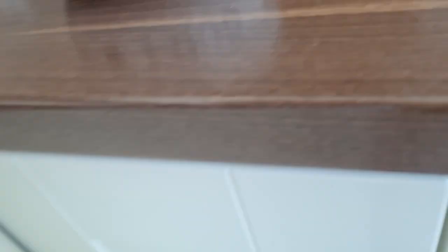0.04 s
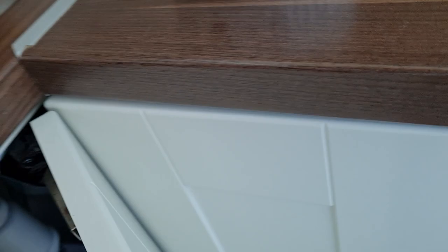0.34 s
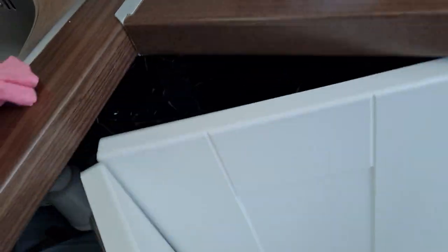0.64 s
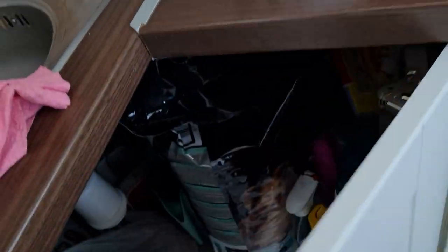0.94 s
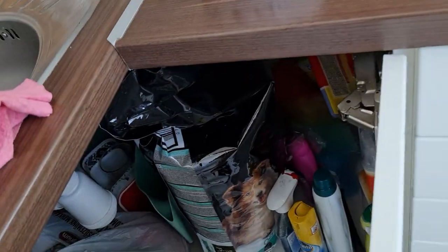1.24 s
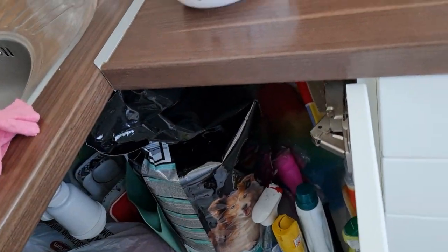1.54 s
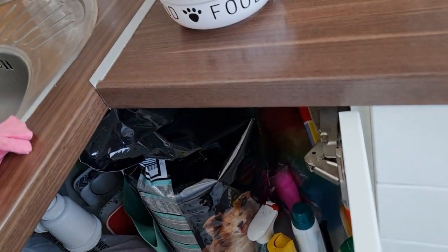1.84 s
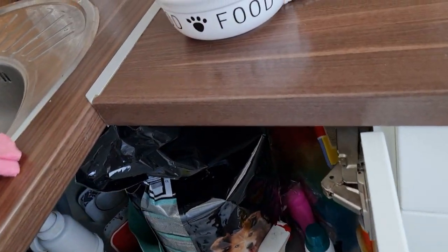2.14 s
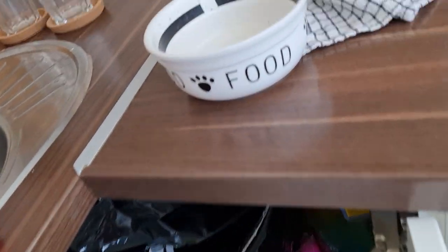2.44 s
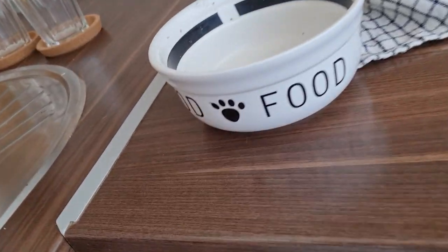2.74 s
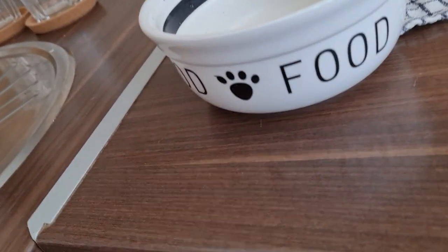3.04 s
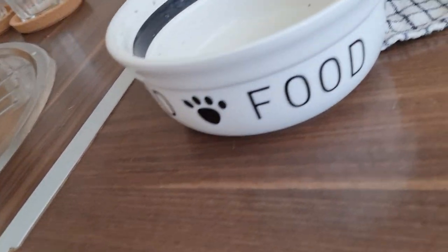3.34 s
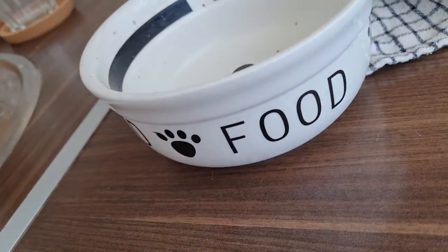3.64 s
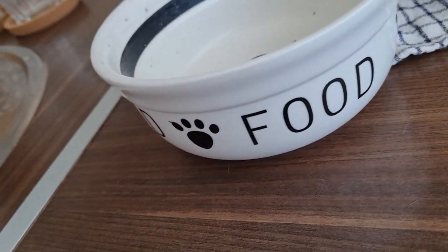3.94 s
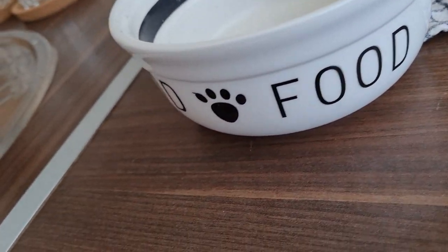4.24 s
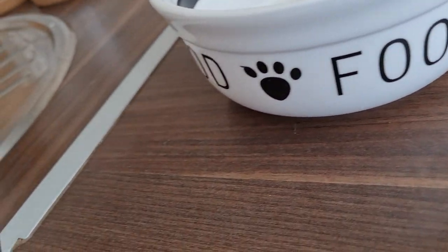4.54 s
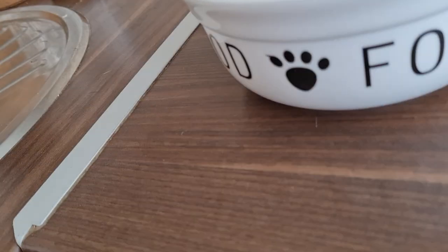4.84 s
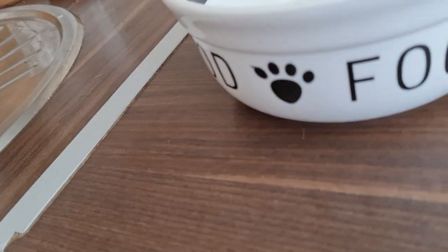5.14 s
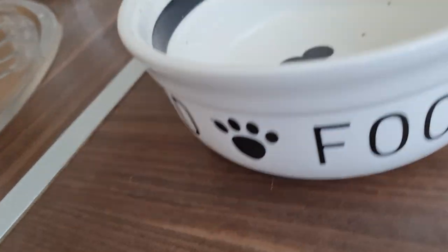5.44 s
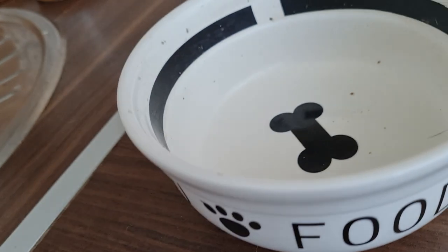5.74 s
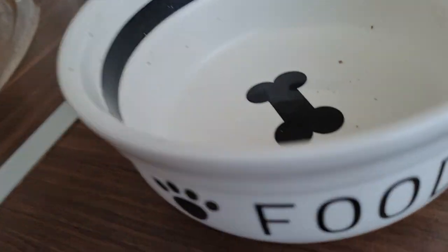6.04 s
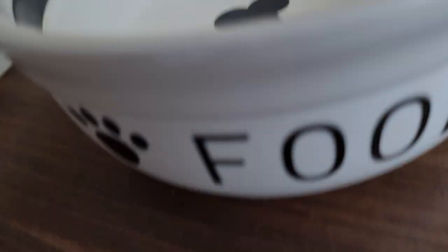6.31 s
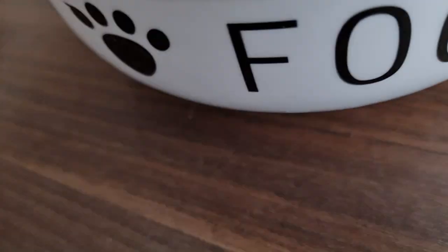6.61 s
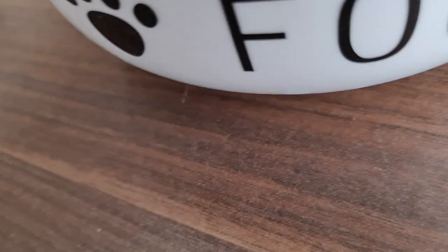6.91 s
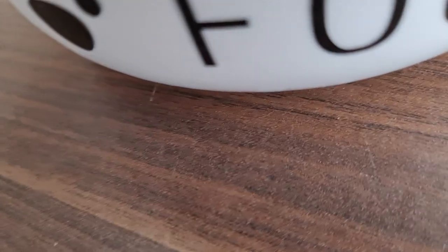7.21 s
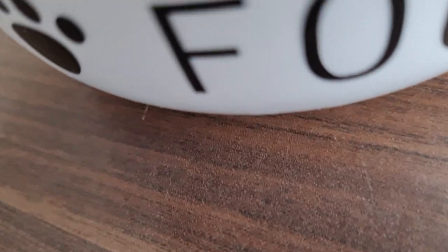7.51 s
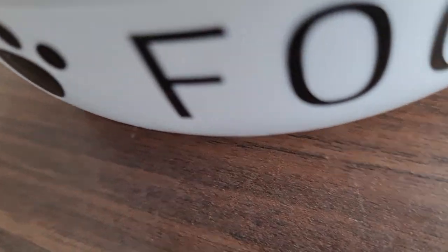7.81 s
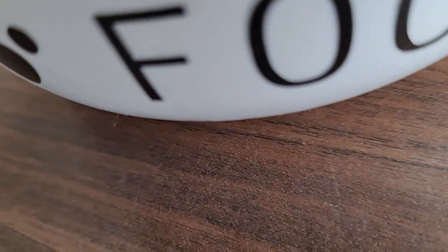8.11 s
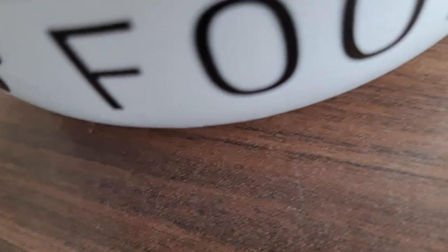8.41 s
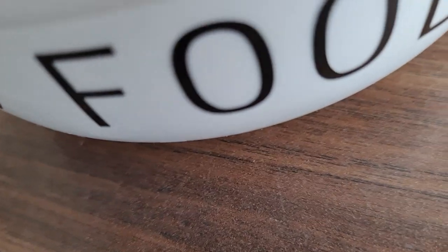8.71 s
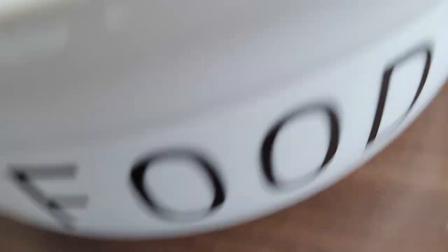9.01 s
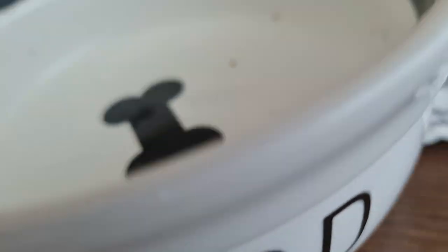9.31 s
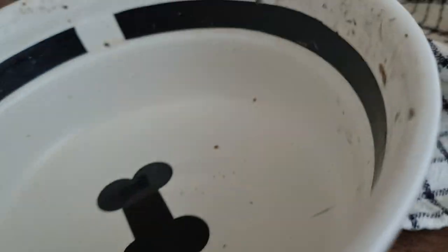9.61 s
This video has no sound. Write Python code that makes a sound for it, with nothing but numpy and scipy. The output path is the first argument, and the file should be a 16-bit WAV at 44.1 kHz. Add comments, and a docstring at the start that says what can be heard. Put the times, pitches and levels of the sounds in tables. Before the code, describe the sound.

Close by in a small, slightly reverberant kitchen, clothing rustles and a cabinet door opens with faint creaks. Plastic containers clack and thud hollowly as someone searches the cupboard and shoves a crinkly bag of dry pet food. The knocking thins out and a cup works through the hard pellets with small crunches and light pings, ending in a brighter rattle and a few low bumps.

```python
"""Scooping kibble from a cupboard.

A sleeve swishes and a cupboard door creaks and bumps open. A hand rummages: plastic tubs knock,
the cabinet booms, dry kibble shifts in a foil bag. A measuring cup then digs into the pellets,
ringing faintly, and lifts a rattling scoopful. A small kitchen adds a short reverb."""
import sys
import numpy as np
from scipy import signal
from scipy.fft import rfft, irfft, next_fast_len
from scipy.io import wavfile

SR = 44100
rng = np.random.default_rng(int(sys.argv[2]) if len(sys.argv) > 2 else 0)


def store_pcm(level_fs):
    """Save levels as 16-bit WAV."""
    pcm = np.round(np.clip(level_fs, -1, 1) * 32767).astype(np.int16)
    wavfile.write(sys.argv[1], SR, np.atleast_2d(pcm).T)


N = 426006

# blows on plastic tubs: start_s, level_db, pitch_hz, hollow_db, snap_db, room_db
TUB_KNOCKS = [(2.647, -28.5, 1380, -8.5, -17.5, -1), (2.751, -33.5, 1330, -11.5, -19, 2),
              (2.866, -12, 1330, -8.5, -12, -6), (2.918, -12, 1980, -19, -48.5, -7),
              (3.0304, -8, 866, -22, -37.5, -7), (3.074, -21.5, 1840, -15, -6.5, -0.5),
              (3.134, -11, 1200, -6.5, -16, -4), (3.1413, -7, 1290, -26, -29.5, -8.5),
              (3.239, -20.5, 1140, -8.5, -32, -2), (3.29, -22.5, 990, -18, -40, -8),
              (3.397, -24, 686, -10.5, -37, 3.5), (3.445, -19.5, 1160, -9.5, -31, -5),
              (3.696, -24.5, 1270, 1.5, -18.5, 2.5), (3.77, -30, 1520, -5, -12.5, -4),
              (3.798, -21.5, 1660, -19.5, -9.5, -10.5), (3.811, -27, 895, -3.5, -12, -8),
              (4.006, -27.5, 1800, -8, -32.5, -10), (4.144, -16.5, 2200, -15, -36, -7.5),
              (4.3366, -15.5, 2230, -20, -34, -9.5), (4.427, -27, 2050, -24, -51.5, -8.5),
              (4.4624, -6, 2070, -28.5, -4.5, -10.5), (4.468, -6.5, 2100, -17.5, -8.5, -1),
              (4.715, -20, 890, -13, -34.5, -1), (4.739, -15, 1470, -9.5, -15.5, -9),
              (4.791, -21, 1170, -11.5, -50, -3), (5.047, -34, 815, 1, -29.5, 2),
              (5.0827, -1.5, 2320, -18.5, -16, -4), (5.2733, -14, 1090, -16.5, -44, -5),
              (5.2862, -3.5, 2350, -38.5, -24.5, -7), (5.326, -18.5, 1800, -8.5, -28, 2.5),
              (5.352, -15.5, 1490, -13.5, -21, 2.5), (5.506, -30, 1200, -19.5, -49, -6),
              (5.62, -4.5, 1430, -31.5, -28, -5), (5.743, -24.5, 1370, -14.5, -31.5, -4.5),
              (5.984, -32, 1230, -6.5, -46, -9.5), (7.638, -27, 1390, -10.5, -43, -4.5),
              (8.153, -27.5, 1500, -22, -34, -4.5), (8.817, -52, 501, 10, -42, 11),
              (8.875, -26, 604, -4, -38, 2), (8.986, -27.5, 1500, -19, -49, -9),
              (9.013, -17, 1550, -21.5, -36, -0.5), (9.178, -21, 715, -8, -46, 5)]
# hollow cupboard resonances: pitch_hz, width_hz, gain_db
CUPBOARD_MODES = [(140, 11, 0), (195, 18, 1), (254.3, 31.3, -1.5), (329, 51, -3), (405, 45, -3.5),
                  (467, 23, 0.5), (525, 16, -1.5), (687, 210, -8.5), (797.6, 31, -7)]
# measuring cup modes: pitch_hz, level_db, t60_s
CUP_MODES = [(1005, -2.5, 0.081), (1372, 4, .09), (1896, -6, .07), (1980, 1, 0.18), (2534, -2, 0.36),
             (3450, -3.5, 0.11), (3760, -3, .07), (4170, -6, .12), (4327, -4.5, .12), (4900, -7, .11),
             (5340, -5.5, .1), (5740, -2.5, 0.037), (6250, -5, .12), (7050, -4.5, 0.084),
             (8780, -6.5, 0.076)]
# foil crackle spectrum: freq_hz, level_db
FOIL_SPECTRUM = [(2500, -13), (4500, -4), (6500, -8), (8500, -3.5), (10500, -8), (13000, -8),
                 (16000, -17.5)]


def amp(db):
    return 10 ** (np.asarray(db) / 20)


def decay(t, t60_s):
    return amp(-60 * t / t60_s)


def unit_rms(x):
    return x / np.sqrt(np.mean(x ** 2) + 1e-20)


def unit_energy(x):
    return unit_rms(x) / np.sqrt(x.shape[-1])


def log_interp(points, hz):
    """Read (freq_hz, value) points on a log frequency axis."""
    freq_hz, value = np.transpose(points)
    return np.interp(np.log(hz + 1), np.log(freq_hz + 1), value)


def add(track, start_s, x):
    part = track[:, round(start_s * SR):][:, :x.shape[-1]]
    part += x[..., :part.shape[1]]


def delay_left(x, samples):
    return np.array([np.pad(x[0], (samples, 0))[:N], x[1]])


def noise(count, corr):
    """Stereo white noise with left-right correlation corr."""
    mid, side = rng.standard_normal((2, count))
    angle = np.arccos(corr) / 2
    mid, side = np.cos(angle) * mid, np.sin(angle) * side
    return np.array([mid + side, mid - side])


def filtered(x, response):
    size = next_fast_len(N + 8192)
    return irfft(rfft(x, size) * response(np.fft.rfftfreq(size, 1 / SR)), size)[..., :N]


def coloured(x, spectrum):
    """Shape x by (freq_hz, level_db) points, at rms 1."""
    return unit_rms(filtered(x, lambda hz: amp(log_interp(spectrum, hz))))


def minimum_phase(x, spectrum, size=2048):
    """Causal filter from the folded cepstrum; keeps attacks sharp."""
    cepstrum = irfft(np.log(amp(log_interp(spectrum, np.fft.rfftfreq(size, 1 / SR)))))
    cepstrum[1:size // 2] *= 2
    cepstrum[size // 2 + 1:] = 0
    impulse = irfft(np.exp(rfft(cepstrum)))
    return signal.fftconvolve(x, impulse[None], axes=1)[:, :x.shape[1]]


def resonant(x, modes):
    """Parallel resonators of alternating sign, low-passed an octave above the highest."""
    edge_hz = 2 * max(hz for hz, _, _ in modes)

    def response(f):
        peaks = sum((-1) ** k * amp(db) * 1j * f * width_hz / (hz * hz - f * f + 1j * f * width_hz)
                    for k, (hz, width_hz, db) in enumerate(modes))
        return peaks / (1 + 1j * np.sqrt(2) * f / edge_hz - (f / edge_hz) ** 2)
    return filtered(x, response)


def in_kitchen(x, wet_db):
    """Direct sound plus a fresh noise tail whose treble dies first."""
    reverb_times = [(100, 0.96), (500, 0.6), (2000, 0.42), (6000, 0.42), (15000, 0.22)]  # freq_hz, t60_s
    hz, frame_s, spectra = signal.stft(rng.standard_normal((2, SR * 2 // 3)), SR, nperseg=256)
    spectra = spectra * decay(frame_s, log_interp(reverb_times, hz)[:, None])
    tail = signal.istft(spectra, SR, nperseg=256)[1]
    onset = 1 - np.exp(-np.arange(tail.shape[1]) / SR / 0.0038)
    out = amp(wet_db) * signal.fftconvolve(x, unit_energy(tail * onset), axes=1)
    add(out, 0, x)
    return out


def room_tone():
    """Faint, steady, mostly low noise."""
    spectrum = [(20, -16.5), (38, -12.5), (95, -5.5), (120, -29.5), (240, -20), (470, -36.5), (1200, -44),
                (5000, -50), (16000, -59.5)]  # freq_hz, level_db
    return amp(-67) * coloured(noise(N, corr=0.35), spectrum)


def sleeve():
    """Cloth slides on cloth: a fine hiss swells with each move."""
    swishes = [(0.343, -57.5, 0.037), (0.447, -55, 0.07), (0.894, -61, 0.032), (0.973, -64, 0.042),
               (1.181, -52.5, 0.048), (1.94, -63, 0.038), (2.148, -69.5, 0.045), (2.559, -65.5, 0.044)]  # centre_s, level_db, half_length_s
    cloth_spectrum = [(600, -30.5), (1300, -17.5), (2200, -4.5), (3200, -5.5), (4000, -10), (5500, -9),
                      (9000, -13.5), (16000, -21)]  # freq_hz, level_db
    t = np.arange(N) / SR
    swell = sum(amp(db) / np.cosh(np.minimum(((t - centre_s) / half_s) ** 2, 20)) ** 0.5
                for centre_s, db, half_s in swishes)
    return swell * coloured(noise(N, corr=0.037), cloth_spectrum)


def sleeve_squeaks(half_length_s=0.039, width_hz=200):
    """Rubbing cloth sings briefly in one narrow band."""
    squeaks = [(0.268, -59.5, 1900), (2.15, -67.5, 2630)]  # centre_s, level_db, pitch_hz
    out, t = np.zeros((2, N)), np.arange(N) / SR
    for centre_s, db, hz in squeaks:
        band = unit_rms(resonant(noise(N, corr=0.17), [(hz, width_hz, 0)]))
        out += amp(db) * np.exp(-((t - centre_s) / half_length_s) ** 2) * band
    return out


def door():
    """The hinges give in short, soft creaks; the panel hums after each."""
    creaks = [(0.316, -45, -8), (0.384, -42.5, -30), (0.547, -49.5, -10.5), (0.671, -44.5, 4.5),
              (0.729, -53, 11.5), (0.976, -55, -5)]  # start_s, level_db, ring_db
    creak_spectrum = [(100, 4), (450, -0.5), (850, -9), (1900, -4.5), (3500, -19), (15000, -38)]  # freq_hz, level_db
    panel_modes = [(187.9, 6.5, 0.5), (375, -17, 0.38), (465, -10.5, 0.2), (1690, -18, .12),
                   (2220, -12, 0.081)]  # pitch_hz, level_db, t60_s
    out, t = np.zeros((2, N)), np.arange(SR * 2 // 3) / SR
    for start_s, db, ring_db in creaks:
        friction = noise(len(t), corr=0.04) * (1 - np.exp(-t / 0.003)) * decay(t, 0.41)
        creak = unit_energy(minimum_phase(friction, creak_spectrum))
        ring = sum(amp(mode_db) * decay(t, t60_s) * np.sin(2 * np.pi * hz * t)
                   for hz, mode_db, t60_s in panel_modes)
        add(out, start_s, amp(db + 26) * creak + amp(db + ring_db + 30) * unit_energy(ring))
    return out


def cupboard_murmur(corr):
    """The hollow cupboard driven by steady noise, at rms 1."""
    return unit_rms(resonant(noise(N, corr), CUPBOARD_MODES))


def cabinet(boom_hz=73.6, pitch_scatter=0.08):
    """Bumps and knocks ring the lowest mode; bumps also wake the cavity; the swaying load rumbles."""
    bumps = [(.253, -42, -58), (.33, -40, -60.5), (0.69, -39, -54), (0.771, -37.5, -72), (3.066, -28, -30),
             (3.149, -21.5, -23.5), (3.819, -27, -34), (4.059, -42, -43.5), (4.201, -43, -39),
             (4.787, -31, -31), (4.811, -25.5, -26.5), (5.049, -23, -32.5), (5.201, -32, -49),
             (5.377, -26.5, -30), (5.443, -27, -31.5), (5.674, -34, -34.5), (5.857, -38.5, -34),
             (6.223, -52, -37), (6.407, -49.5, -43.5), (6.764, -65, -48.5), (7.67, -54, -51),
             (7.966, -42.5, -42.5), (9.031, -30.5, -41), (9.221, -43, -22), (9.406, -31.5, -45),
             (9.514, -37, -36.5)]  # arm or door contacts: start_s, boom_db, hollow_db
    sway_levels = [(2.6, -68.5), (3.07, -44.5), (3.48, -54), (4.82, -57.5), (4.98, -53.5), (5.55, -46.5),
                   (6.55, -71.5), (7.65, -59), (8.71, -63.5), (9.28, -43), (9.66, -62.5)]  # time_s, level_db
    rumble_spectrum = [(20, -24), (40, -12), (68, -1), (88, 4.5), (115, -15), (600, -120)]  # freq_hz, level_db
    booms, contacts = np.zeros((2, 2, N))
    t = np.arange(SR // 3) / SR
    blows = [(start_s, db) for start_s, db, _ in bumps]
    blows += [(start_s, db + hollow_db - 8) for start_s, db, _, hollow_db, _, _ in TUB_KNOCKS]
    boom_envelope = (1 - np.exp(-t / 0.009)) ** 2 * decay(t, 0.19)
    for start_s, db in blows:
        hz = boom_hz * (1 + pitch_scatter * rng.standard_normal())
        phase = rng.normal(0, 0.18, (2, 1))
        add(booms, start_s, amp(db + 9.5) * np.sin(2 * np.pi * hz * t + phase) * boom_envelope)
    contact_envelope = (1 - np.exp(-t / 0.026)) * decay(t, 0.095)
    for start_s, _, hollow_db in bumps:
        contact = unit_energy(noise(len(t), corr=0.51) * contact_envelope)
        add(contacts, start_s, amp(hollow_db + 43) * contact)
    rumble = amp(6.5) * coloured(noise(N, corr=0.93), rumble_spectrum)
    murmur = amp(-4.5) * cupboard_murmur(corr=0.5)
    sway_db = np.interp(np.arange(N) / SR, *np.transpose(sway_levels), left=-120, right=-120)
    return booms + resonant(contacts, CUPBOARD_MODES) + amp(sway_db) * (rumble + murmur)


def foil_crackle(rate_per_s, spread_db, life_s, wet_db):
    """Foil crinkles in tiny noise bursts of random time and size, at rms 1."""
    onsets = rng.random(N) < rate_per_s / SR
    sizes = onsets * amp(spread_db * np.minimum(rng.exponential(size=N), 3))
    power = signal.lfilter([1], [1, -np.exp(-2 / (life_s * SR))], sizes ** 2)
    bursts = np.sqrt(power) * noise(N, corr=0.026)
    return coloured(in_kitchen(bursts, wet_db)[:, :N], FOIL_SPECTRUM)


def pellet_clatter(rate_per_s, spread_db, decay_cycles, wet_db):
    """Hard pellets collide at random; each rings a few cycles at its own pitch."""
    when, pitch, size, pan = rng.random((int(rate_per_s * N / SR), 4)).T[..., None]
    k = np.arange(SR // 100)
    hz = 700 * 16 ** pitch
    cycles = hz * k / SR
    strength = amp(spread_db * np.minimum(-np.log(1 - size), 3)) * hz
    ticks = strength * np.sin(2 * np.pi * cycles) * np.exp(-cycles / decay_cycles) * (1 - k / len(k))
    index = ((when * N).astype(int) + k).ravel()
    direct = np.array([np.bincount(index, (ticks * gain).ravel(), N)[:N]
                       for gain in (np.sqrt(pan), np.sqrt(1 - pan))])
    return in_kitchen(direct, wet_db)[:, :N]


def push_gains(pushes, rise_s, stop_db_per_s, trickle_db, fade_db_per_s):
    """Pellet, bulk and foil gains: each push builds, stops and trickles on; pushes add in power."""
    power, t = np.zeros((3, N)), np.arange(SR * 3 // 2) / SR
    trickles_db = trickle_db + np.array([[0], [0], [-7]])  # foil settles sooner
    for start_s, length_s, db, bulk_db, foil_db in pushes:
        after_s = np.maximum(t - length_s, 0)
        release = np.maximum(amp(-stop_db_per_s * after_s), amp(trickles_db - fade_db_per_s * after_s))
        envelope = np.minimum(t / rise_s, 1) * release
        add(power, start_s, (amp([[db], [db + bulk_db], [db + foil_db]]) * envelope) ** 2)
    return np.sqrt(power)


def bag():
    """A hand shoves the bag: pellets rattle, their bulk thuds in the cupboard, foil crackles."""
    shoves = [(2.66, 0.19, -57, -0.5, -10), (3.12, 0.18, -38, -3.5, -15), (3.54, 0.06, -47, -2.5, -8.5),
              (3.71, 0.18, -45, -3.5, -17.5), (3.88, 0.088, -52.5, -4.5, -4.5), (3.98, 0.082, -55, 2, -4.5),
              (4.11, 0.045, -50.5, 6, -11.5), (4.27, 0.032, -56, 3, 1), (4.35, 0.21, -51.5, -7, -24),
              (4.48, 0.031, -36.5, -10.5, -9), (4.62, 0.08, -54, -25, 9.5), (4.77, 0.042, -49.5, -1, -16.5),
              (5.1, 0.059, -41, 1.5, -3), (5.3, 0.041, -28.5, -12, -9.5), (5.42, 0.071, -44, -4.5, -19.5),
              (5.64, 0.1, -41, -4, -10.5), (5.83, 0.19, -48.5, -4.5, -13), (6.1, 0.17, -51, -7, -9.5),
              (6.35, 0.064, -56.5, 2.5, -1)]  # start_s, length_s, level_db, bulk_db, foil_db
    rattle_spectrum = [(400, -21.5), (700, 1.5), (1000, 4), (1350, 5), (2000, 1.5), (3000, -4.5),
                       (4000, -20), (6000, -18), (10000, -42)]  # freq_hz, level_db
    rattle_gain, bulk_gain, foil_gain = push_gains(
        shoves, rise_s=0.2245, stop_db_per_s=129, trickle_db=-26, fade_db_per_s=47)
    clatter = pellet_clatter(rate_per_s=600, spread_db=7, decay_cycles=4.1, wet_db=3.5)
    rattle = rattle_gain * coloured(clatter, rattle_spectrum)
    bulk = bulk_gain * cupboard_murmur(corr=0.39)
    foil = foil_gain * foil_crackle(rate_per_s=500, spread_db=10, life_s=0.00095, wet_db=5)
    return (amp(5.5) * rattle + amp(6.5) * (bulk + foil)) * amp([[1.1], [-1.1]])


def tubs():
    """Each knock is a graze, a sharp push and a chatter of thin plastic; the cupboard rings along."""
    knocks, thuds = np.zeros((2, 2, N))
    lead = round(0.012 * SR)  # the graze starts ahead of the blow
    t = (np.arange(SR // 10) - lead) / SR

    def burst(t60_s, corr):
        return unit_energy(noise(len(t), corr) * (t >= 0) * decay(np.abs(t), t60_s))

    for start_s, db, hz, hollow_db, snap_db, room_db in TUB_KNOCKS:
        push = amp(-16) * (t == 0) + amp(-3.5) * burst(t60_s=0.0077, corr=0.22)
        chatter = amp(-2) * burst(t60_s=0.059, corr=0.18)
        graze_db = -4.5 + 0.37 * hollow_db  # hollow blows are softer and graze more
        graze = amp(graze_db) * unit_energy(noise(len(t), corr=0.3) * decay(np.abs(t), 0.03))
        shell_spectrum = [(100, -28), (400, -14), (hz * 0.46, -4.5), (hz, 1), (hz * 1.48, -3),
                          (3450, -5), (5200, snap_db / 2 - 4.5), (8500, snap_db + 3.5),
                          (12500, snap_db - 0.5), (15800, snap_db - 12)]
        shell = unit_energy(minimum_phase(graze + push + chatter, sorted(shell_spectrum)))
        wall_ring = unit_energy(np.sin(2 * np.pi * hz * t) * (t >= 0) * decay(np.abs(t), 0.013))
        blow = unit_energy(shell + amp(-7.5) * wall_ring)
        add(knocks, start_s - lead / SR, amp(db + 13.5) * in_kitchen(blow, room_db))
        add(thuds, start_s - lead / SR, amp(db + hollow_db + 42.5) * burst(t60_s=0.17, corr=0.94))
    return (knocks + resonant(thuds, CUPBOARD_MODES)) * amp([[1.4], [-1.4]])


def cup_ring(drive, boost_db=0, detune=0.0112):
    """The cup's modes, detuned by the shifting load, each with its own strength per channel."""
    hz, db, t60_s = np.transpose(CUP_MODES)
    t = np.arange(SR * 2 // 5) / SR
    loaded_hz = hz * (1 + detune * rng.standard_normal(len(hz)))
    modes = np.sin(2 * np.pi * np.outer(loaded_hz, t)) * decay(t, t60_s[:, None])
    strength = amp(db + boost_db + 3.4 * rng.standard_normal((2, len(hz))))
    return signal.fftconvolve(drive, unit_energy(strength @ modes), axes=1)


def scoop(bite_rise_s=0.0031, bite_hold_s=0.011, bite_t60_s=0.043):
    """Pellets stream and drum in the crackling bag; each bite of the rim crunches and rings the cup."""
    strokes = [(6.52, 0.052, -49, -4.5, -14.5), (6.64, 0.098, -50, -2, -9.5), (6.88, 0.26, -63.5, 1, -13),
               (7.058, 0.21, -54.5, -7, -6.5), (7.32, 0.023, -48.5, -4, -16),
               (7.48, 0.14, -53.5, -4.5, -16.5), (7.61, 0.044, -43, 0, -29), (7.76, 0.48, -63, 1.5, -11),
               (8.29, 0.12, -56.5, -4.5, -10), (8.62, 0.021, -58.5, 5.5, -6),
               (8.87, 0.047, -37.5, -3.5, -6), (9.01, 0.021, -26.5, -12, 2),
               (9.08, 0.072, -31.5, -4.5, -18), (9.17, 0.12, -34, 0.5, -12.5),
               (9.37, 0.057, -42.5, 2.5, -8), (9.62, 0.029, -54.5, 24.5, -24)]  # cup through kibble: start_s, length_s, level_db, bulk_db, foil_db
    bites = [(6.628, -33, 4300), (6.706, -38.5, 2300), (6.738, -41.5, 4900), (7.017, -37.5, 5800),
             (7.066, -29, 1377), (7.076, -24, 3700), (7.117, -30.5, 2520), (7.154, -32, 3450),
             (7.184, -31.5, 5450), (7.2416, -32.5, 4360), (7.3478, -36.5, 1380), (7.539, -38, 5300),
             (7.591, -32, 1950), (7.636, -34.5, 2520), (7.728, -33, 5750), (7.796, -29.5, 1980),
             (7.826, -29, 5500), (7.917, -44, 7050), (8.013, -35.5, 4170), (8.057, -30, 4000),
             (8.14, -40.5, 2520), (8.292, -37.5, 2520), (8.387, -47, 4900), (8.449, -60, 1390),
             (8.514, -45.5, 4150), (8.642, -40.5, 4260), (8.865, -28.5, 3590), (8.945, -33.5, 5340),
             (9.038, -15.5, 4440), (9.05, -18.5, 7050), (9.064, -13.5, 1380), (9.125, -26.5, 3450)]  # start_s, level_db, favoured_hz
    pellet_spectrum = [(400, -39), (800, -3), (1400, 1), (2200, 1), (3000, -7.5), (5500, -17), (9000, -23),
                       (16000, -40.5)]  # freq_hz, level_db
    crunch_spectrum = [(500, -38), (1000, -4), (1700, 3), (5500, -4.5), (9000, -10.5), (16000, -17.5)]  # freq_hz, level_db
    stream_gain, bulk_gain, foil_gain = push_gains(
        strokes, rise_s=0.18, stop_db_per_s=132, trickle_db=-18, fade_db_per_s=37.5)
    crunches, pings = np.zeros((2, 2, N))
    t = np.arange(SR // 10) / SR
    envelope = (1 - np.exp(-t / bite_rise_s)) * decay(np.maximum(t - bite_hold_s, 0), bite_t60_s)
    for start_s, db, favoured_hz in bites:
        ticks = unit_energy(noise(len(t), corr=0.4) * (rng.random(len(t)) < 0.05) * envelope)
        offset_oct = np.log2(np.array(CUP_MODES)[:, 0] / favoured_hz)
        boost_db = 10.5 * np.exp(-(offset_oct / 0.07) ** 2)  # the spot hit favours nearby pitches
        add(pings, start_s, amp(db + 16) * unit_energy(cup_ring(ticks, boost_db)))
        add(crunches, start_s, amp(db + 20.5) * in_kitchen(ticks, wet_db=-3))
    crunches = filtered(crunches, lambda hz: amp(log_interp(crunch_spectrum, hz)))
    clatter = pellet_clatter(rate_per_s=800, spread_db=4, decay_cycles=4.9, wet_db=-1)
    stream = stream_gain * coloured(clatter, pellet_spectrum)
    ring = cup_ring(stream)[:, :N]
    foil = foil_gain * foil_crackle(rate_per_s=130, spread_db=-3.5, life_s=0.001, wet_db=5.5)
    bulk = bulk_gain * cupboard_murmur(corr=0.84)
    mix = amp(6) * stream + crunches + pings + amp(-13) * ring + amp(4.5) * (foil + bulk)
    return mix * amp([[0.7], [-0.7]])


def scene():
    background = room_tone()
    rummaging = delay_left(tubs() + bag(), samples=3)
    handling = sleeve() + sleeve_squeaks() + door() + cabinet()
    return background + rummaging + handling + delay_left(scoop(), samples=9)


def record(dry):
    """Soft limiter on the tallest peaks, then a brick-wall low-pass."""
    ceiling, cutoff_hz = 0.95, 16300
    limited = dry / (1 + np.abs(dry / ceiling) ** 6) ** (1 / 6)
    return filtered(limited, lambda hz: hz < cutoff_hz)


dry = scene()
out = record(dry)
store_pcm(out)
```